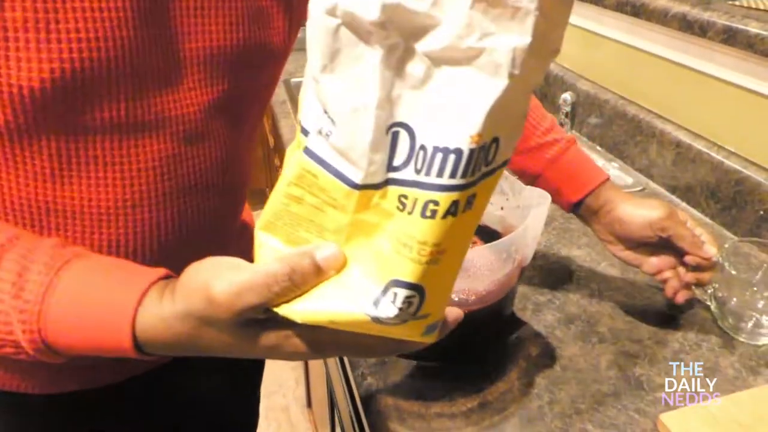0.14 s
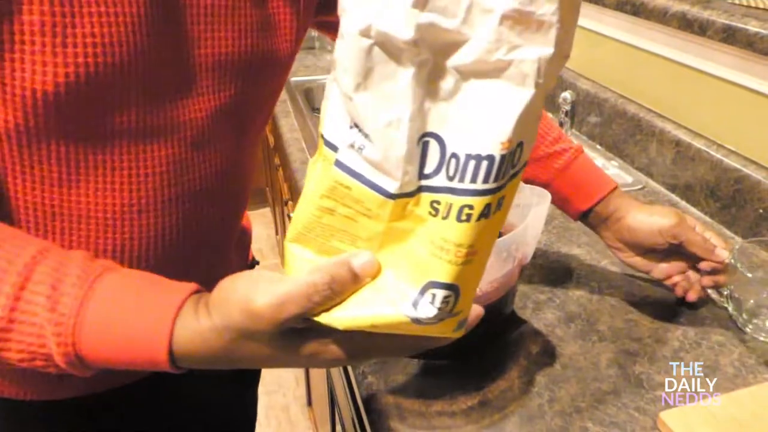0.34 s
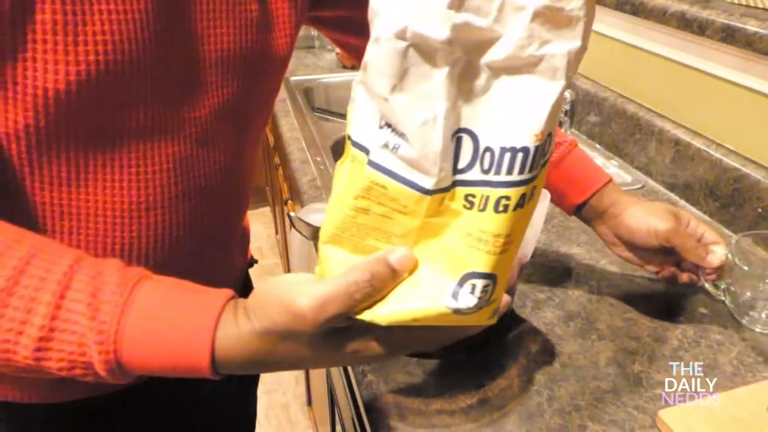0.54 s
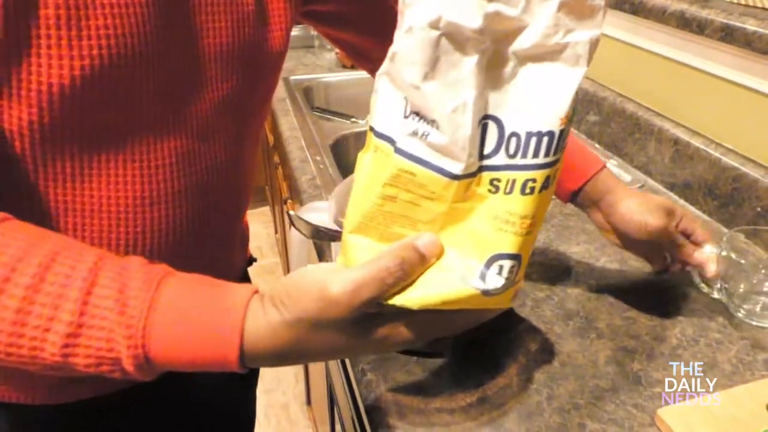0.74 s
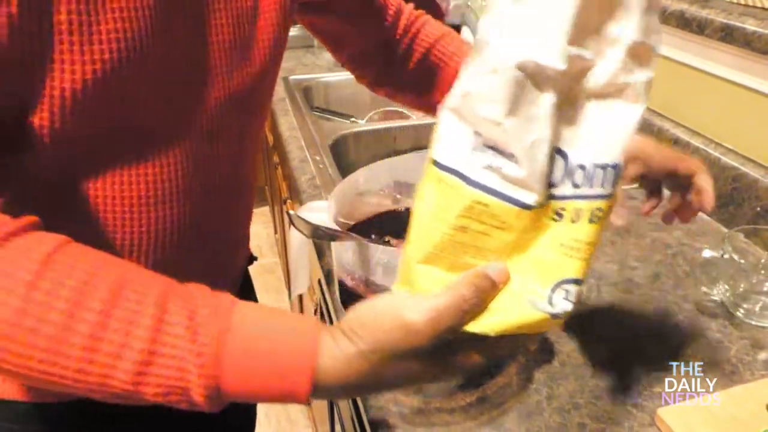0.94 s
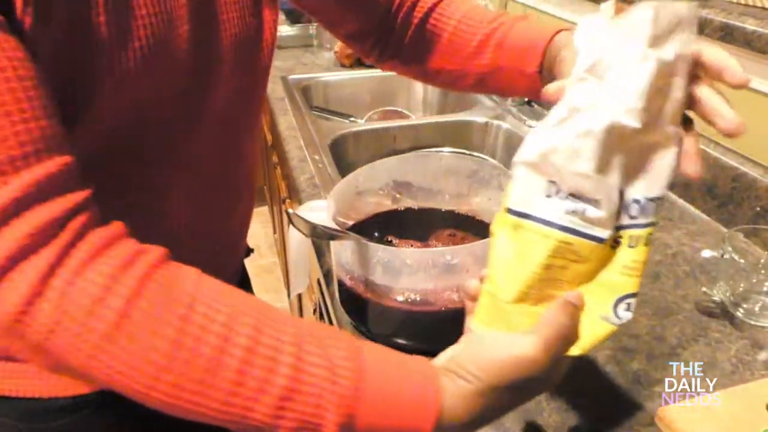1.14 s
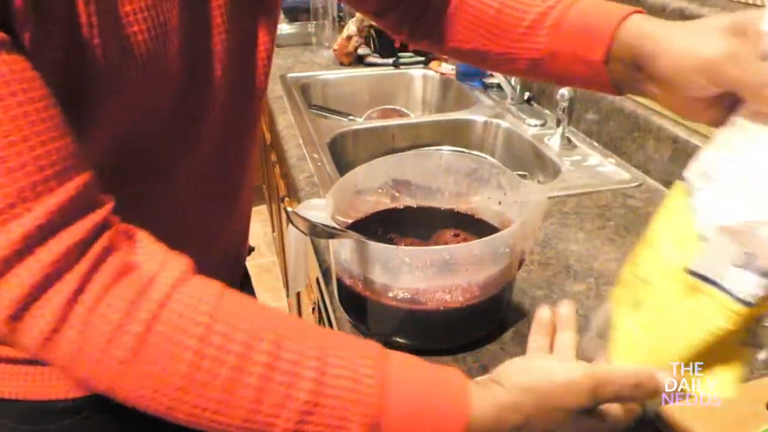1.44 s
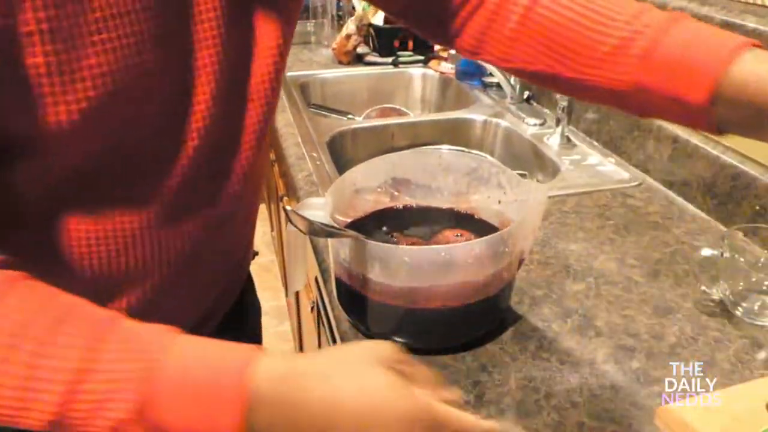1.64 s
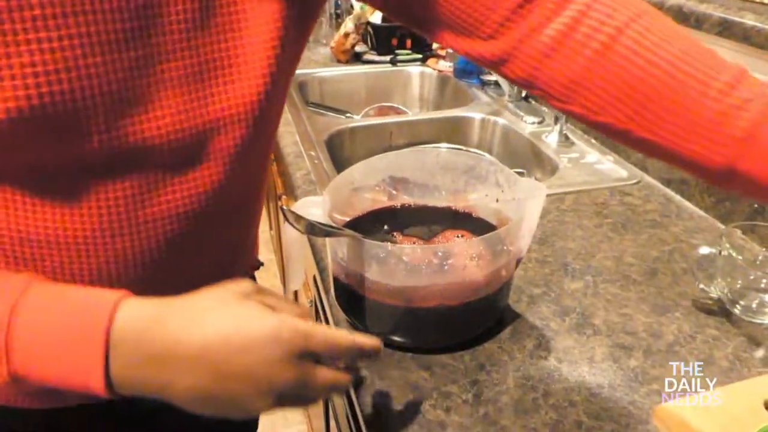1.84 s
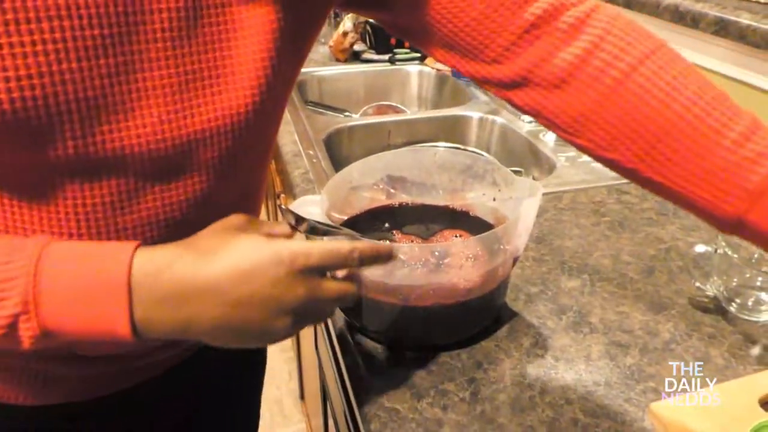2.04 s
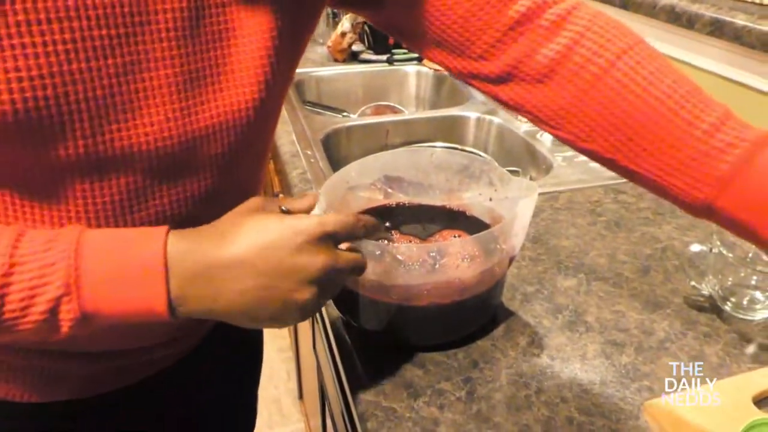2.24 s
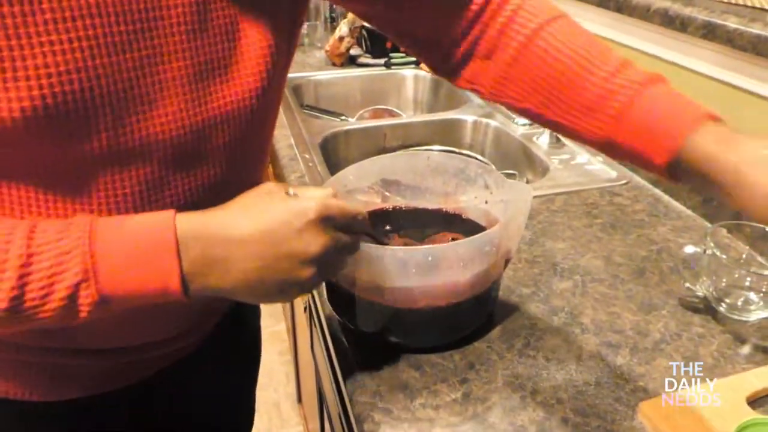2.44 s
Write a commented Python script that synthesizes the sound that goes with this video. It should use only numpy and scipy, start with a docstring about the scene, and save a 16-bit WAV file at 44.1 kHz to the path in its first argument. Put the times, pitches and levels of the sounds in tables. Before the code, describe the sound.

A glass measuring cup thumps onto a hollow kitchen counter, slides briefly, knocks again and settles with a faint ring; then a paper sugar bag snaps and rustles between hands. Small room, close, nearly mono.

```python
"""A glass measuring cup is set down on a hollow kitchen counter: it knocks, slides a little, rocks and settles.
Each contact is an impact: damped swings and filtered noise bursts excite the modes of counter and glass.
Then a paper sugar bag is passed from hand to hand and put aside: its snaps are bright bursts with hollow
pops, its rustle is grainy friction noise. Decaying noise gives the small kitchen's answer over a steady
room tone. The picture is nearly mono, and saturation rounds the hardest hits."""
import sys
import numpy as np
from scipy import signal
from scipy.fft import rfft, irfft, next_fast_len
from scipy.io import wavfile
from scipy.ndimage import uniform_filter1d

SR = 44100
rng = np.random.default_rng(int(sys.argv[2]) if len(sys.argv) > 2 else 0)


def file_out(sig):
    """Save sig as 16-bit WAV at sys.argv[1]."""
    # one column per channel
    cols = np.atleast_2d(sig).T
    # limit, then scale
    lim = np.clip(cols, -1, 1)
    pcm = np.round(lim * 32767).astype(np.int16)
    wavfile.write(sys.argv[1], SR, pcm)


N = 114660  # length of the scene in samples
T = np.arange(SR * 3 // 4) / SR  # time axis of one event, s
TOP_HZ = 15800  # band limit
KITCHEN_BAG_DB = -12  # room answer to the bag


def amp(db):
    """Level to gain: 20 dB is a factor of ten in amplitude."""
    return 10 ** (np.asarray(db) / 20)


def unit(x):
    """Normalisation to rms 1."""
    return x / np.sqrt(np.mean(x ** 2) + 1e-20)


def along(points, hz):
    """Interpolation of (f/Hz, value) points on a logarithmic frequency axis."""
    f, values = np.transpose(points)
    return np.interp(np.log(hz + 1), np.log(f + 1), values)


def colour(x, points):
    """Minimum-phase filtering: folding the cepstrum makes the gain of the (f/Hz, level/dB) points causal."""
    n = x.shape[-1]
    m = 2 * next_fast_len(n // 2 + 4096)
    log_gain = np.log(amp(along(points, np.fft.rfftfreq(m, 1 / SR))))
    cepstrum = irfft(log_gain, m)
    cepstrum[1:m // 2] *= 2
    cepstrum[m // 2 + 1:] = 0
    response = np.exp(rfft(cepstrum))
    return irfft(rfft(x, m) * response, m)[..., :n]


def fade(t60):
    """Exponential decay: the level falls 60 dB in t60 seconds."""
    return np.exp(-np.log(1000) * T / t60)


def add(track, s, x):
    """Superposition: x is summed into the track from s seconds on."""
    part = track[max(round(s * SR), 0):][:len(x)]
    part += x[:len(part)]


def push(hz, rise):
    """Heavily damped oscillation: a swing of a few cycles under an envelope built on a peak at rise seconds."""
    envelope = T / rise * np.exp(1 - T / rise)
    swing = -np.cos(2 * np.pi * hz * T) * envelope
    softened = swing * (1 - np.exp(-hz * T * 2))
    return np.gradient(softened) * SR / (2 * np.pi * hz)  # rate of change


def crack(spectrum, t60, edge=0):
    """Impulsive excitation: coloured decaying noise, at first about rms 1, led by an impulse of size edge."""
    shape = fade(t60)
    burst = rng.standard_normal(len(T)) * shape
    burst[0] += edge
    return unit(colour(burst, spectrum)) * np.sqrt(np.mean(shape ** 2))


def ring(modes, scatter_db):
    """Modal decay: each mode gets a random level at every strike and beats with a close twin."""
    beat_hz, twin_share = 12, .5  # beat_hz is the standard deviation of the twin's detuning
    out = 0
    for hz, db, t60 in modes:
        twin_hz = hz + beat_hz * rng.normal()
        pair = np.sin(2 * np.pi * hz * T) + twin_share * np.sin(2 * np.pi * twin_hz * T)
        out = out + amp(db + scatter_db * rng.normal()) * fade(t60) * pair
    return out / np.hypot(1, twin_share)


def noise(spectrum):
    """Stationary random noise through a spectrum, rms 1."""
    return unit(colour(rng.standard_normal(N), spectrum))


def friction(spectrum):
    """Stick-slip friction: tiny slips of uneven size and a few stronger catches through a spectrum, rms 1."""
    grains_per_s, grain_db = 1400, 1  # rate and spread of the random slip sizes
    catches_per_s, catch_share = 240, .58
    at = np.arange(N) * grains_per_s / SR
    sizes = amp(grain_db * np.interp(at, np.arange(N), rng.standard_normal(N)))
    slips = unit(sizes * rng.standard_normal(N))
    catches = (rng.random(N) < catches_per_s / SR) * rng.standard_normal(N)
    return unit(colour(slips + catch_share * unit(catches), spectrum))


def cup():
    """Impact excitation: each contact clicks and thuds, rings counter and glass, and stirs the cabinet."""
    # contacts of the cup: t/s, thud level/dB, thud f/Hz, click level/dB, glass level/dB
    knocks = [(0.197, -55, 425, -41, -65), (0.2442, 1, 398, -4.5, -44.5), (0.272, -17, 485, -38, -63),
              (0.4612, -20.5, 370, -64, -69), (0.4776, -7.5, 354, -24.5, -39),
              (0.7505, -25.5, 386, -32, -55.5), (0.7757, -4.5, 387, -22, -46.5),
              (0.8562, -11.5, 370, -35, -49.5), (0.9064, -16, 390, -41, -51), (.9526, -6, 348, -10.5, -25),
              (0.973, -12.5, 460, -33, -65), (0.9844, -12, 404, -33, -30.5), (1.0003, -22, 360, -32.5, -47),
              (1.0092, -16.5, 449, -44, -36.5)]
    # spectrum of the contact click: f/Hz, level/dB
    click_spectrum = [(150, -18), (600, 8.5), (950, 4), (1550, -6), (3000, -3), (5500, -16), (7000, -23),
                      (9000, -65)]
    # modes of the cup: f/Hz, level/dB, t60/s
    glass_modes = [(1020, 0, .05), (1030, -14, .27), (1570, 4, .05), (1614, -4.5, .42), (1680, -14, .25),
                   (1810, -19, .5)]
    # spectrum of the glass buzzing on the counter: f/Hz, level/dB
    chatter_spectrum = [(200, -27), (600, 10.5), (1700, 0), (2200, -12.5), (4500, -23), (9000, -42)]
    # modes of the counter: f/Hz, level/dB, t60/s
    counter_modes = [(135.2, -35.5, 0.31), (252.4, -25.5, 0.47), (333, -20, 0.11), (415, -18.5, 0.18),
                     (473.8, -26.5, 0.29), (558, -25.5, 0.35)]
    thud_rise_s, click_t60_s = 0.0017, 0.011
    thud_lag_s = 0.00039  # the counter gives way just after the glass touches it
    tock_hz, tock_db, tock_rise_s = 734, -2.5, 0.00057  # higher swing of the counter top, scaled with the click
    chatter_db, chatter_t60_s = 5, 0.23
    cabinet_thud_db, cabinet_click_db, kitchen_db = 2, -3, -14.5

    out = np.zeros(N)
    for s, thud_db, hz, click_db, glass_db in knocks:
        thud = amp(thud_db) * np.interp(T - thud_lag_s, T, push(hz, thud_rise_s), left=0)
        tock = amp(tock_db) * push(tock_hz, tock_rise_s)
        click = amp(click_db) * (crack(click_spectrum, click_t60_s, edge=3.7) + tock)
        chatter = amp(chatter_db) * crack(chatter_spectrum, chatter_t60_s)
        glass = amp(glass_db) * (ring(glass_modes, scatter_db=4) + chatter)
        counter = amp(thud_db) * ring(counter_modes, scatter_db=0.5)
        hit = thud + click + counter + glass
        add(out, s, hit)
        add(out, s, amp(cabinet_thud_db) * cabinet(thud) + amp(cabinet_click_db) * cabinet(click))
        add(out, s, amp(kitchen_db) * signal.fftconvolve(hit, kitchen()))
    return out


def cabinet(x):
    """High modal density: decaying noise stands for the dense ringing that x stirs up under the counter."""
    # spectrum of the ringing: f/Hz, level/dB
    cabinet_spectrum = [(80, -37), (180, -19.5), (550, -9), (900, 1), (1400, 2), (2500, -10), (6000, -30),
                        (15000, -24)]
    t60_s, delay_s = 0.68, 0.00069
    tail = rng.standard_normal(len(T)) * fade(t60_s) * (T > delay_s)
    return signal.fftconvolve(x, colour(tail / np.linalg.norm(tail), cabinet_spectrum))


def slide():
    """Sliding friction: the foot scrapes, and a narrow judder band glides up in pitch, then drops a little."""
    # strokes of the cup: start t/s, length t/s, level/dB
    slides = [(0.27, 0.39, -39), (0.584, 0.19, -37)]
    # spectrum of the scrape: f/Hz, level/dB
    scrape_spectrum = [(100, -48), (230, 1), (400, 4), (600, -3), (1600, -17.5), (6000, -27.5), (9000, -46)]
    # judder of the foot as the cup is pushed along: t/s, slip rate f/Hz, level/dB
    judder_path = [(0.578, 369.7, -47), (.635, 485.3, -38.5), (.68, 515, -43), (.71, 604, -46),
                   (.745, 537, -52)]
    judder_width_hz = 90
    t = np.arange(N) / SR
    strokes = 0
    for start, length, stroke_db in slides:
        strokes = strokes + amp(stroke_db) * np.sin(np.pi * np.clip((t - start) / length, 0, 1))
    s, hz, db = np.transpose(judder_path)
    # slow random modulation of a gliding carrier makes a narrow band of noise
    grip = uniform_filter1d(rng.standard_normal((2, N)), int(SR / judder_width_hz))
    phase = 2 * np.pi * np.cumsum(np.interp(t, s, hz)) / SR
    judder = unit(grip[0] * np.sin(phase) + grip[1] * np.cos(phase))
    judder_gain = np.interp(t, s, amp(db), left=0, right=0)
    return strokes * friction(scrape_spectrum) + judder_gain * judder


def bag_snaps():
    """Buckling: a crease flips with a bright crack and pumps the air in the bag; the wall shakes with the pop."""
    # buckles: t/s, crack level/dB, crease f/Hz, crack t60/s, pop level/dB, pop f/Hz
    snaps = [(1.2492, -21, 1330, 0.048, -19, 1020), (1.2532, -32, 3400, 0.076, -20, 335),
             (1.281, -43, 3150, 0.015, -26, 1120), (1.300, -27, 4770, 0.082, -29.5, 1020),
             (1.370, -16, 4150, 0.023, -14, 860), (1.388, -13, 3600, 0.022, -14, 790),
             (1.4042, -5.5, 4890, 0.0099, -10.5, 752), (1.4055, -7, 5340, 0.02, -15, 454),
             (1.4359, -8, 6430, 0.023, -25, 1075), (1.562, -30, 2150, 0.0076, -28.5, 770),
             (1.638, -34.5, 2400, 0.27, -43, 920), (1.659, -28, 2170, 0.042, -42, 1000),
             (1.739, -31.5, 2180, 0.021, -36.5, 647), (1.918, -21, 2140, 0.024, -19, 355),
             (1.94, -12.5, 2870, 0.038, -11, 860), (1.945, -11, 6740, 0.029, -16.5, 1090),
             (2.1214, -8.5, 4920, 0.03, -38, 640), (2.1247, -6.5, 2830, 0.0076, -44, 660),
             (2.1295, -9, 6400, 0.0038, -49, 700), (2.152, -14.5, 5150, 0.0097, -45, 885),
             (2.175, -40, 2440, 0.022, -23.5, 1424), (2.35, -35, 8640, 0.013, -47, 900)]
    # spectrum of the crackling paper: f/Hz, level/dB
    paper_spectrum = [(100, -38), (350, -3.5), (900, -12.5), (1600, -4.5), (3400, 3.5), (6700, -4.5),
                      (9000, -10), (15000, -37)]
    # spectrum of the shaking wall: f as a multiple of the pop pitch [1], level/dB
    wall_points = [(.2, -24), (.6, -0.5), (1.2, 3.5), (4, -14), (15, -55)]
    crease_share, crease_t60_s, pop_rise_s = .7, .008, .0013
    slope_db = -4  # per octave above the crease pitch
    pop_rattle, pop_t60_s = 0.38, 0.05  # share and decay of the wall's shaking

    out = np.zeros(N)
    for s, crack_db, crease_hz, t60, pop_db, pop_hz in snaps:
        crease = crease_share * np.sin(2 * np.pi * crease_hz * T) * fade(crease_t60_s)
        wall = crack([(multiple * pop_hz, db) for multiple, db in wall_points], pop_t60_s)
        dulling = [(crease_hz, 0), (TOP_HZ, slope_db * np.log2(TOP_HZ / crease_hz))]
        paper = colour(crack(paper_spectrum, t60, edge=0.66), dulling)
        pop = push(pop_hz, pop_rise_s) + pop_rattle * wall
        snap = amp(crack_db) * (0.5 * paper + crease) + amp(pop_db) * pop
        add(out, s, snap)
        add(out, s, amp(KITCHEN_BAG_DB) * signal.fftconvolve(snap, kitchen()))
    return out


def bag_rustle():
    """Rubbing friction: under the hands a hollow body and a grainy hiss swell and fade, with a room tail."""
    # rubs: peak t/s, rise to the peak from -20 dB t/s, fall to -20 dB t/s, body level/dB, hiss level/dB
    rubs = [(1.198, 0.018, 0.26, -36.5, -41), (1.259, 0.042, 0.069, -42, -44.5),
            (1.345, 0.15, 0.39, -39.5, -44), (1.53, 0.028, 0.037, -41.5, -67),
            (1.691, 0.029, 0.042, -44.5, -49.5), (1.754, 0.037, 0.047, -43.5, -51),
            (1.896, 0.16, 0.2, -69, -43), (1.936, 0.044, 0.13, -31, -40),
            (2.106, 0.019, 0.12, -43.5, -35.5), (2.157, 0.047, 0.11, -34.5, -42),
            (2.272, 0.055, 0.026, -51.5, -46)]
    # spectrum of the hollow body: f/Hz, level/dB
    body_spectrum = [(130, -10.5), (330, 3), (900, 7), (1600, 2.5), (3000, -4), (5000, -6), (9000, -33)]
    # spectrum of the hiss: f/Hz, level/dB
    hiss_spectrum = [(1000, 2.5), (6800, 5.5), (9000, 0.5), (12000, -6), (15500, -17)]
    t, body, hiss = np.arange(N) / SR, 0, 0
    for s, rise, fall, body_db, hiss_db in rubs:
        swell_db = -20 * np.where(t < s, ((s - t) / rise) ** 2, (t - s) / fall)
        body = np.hypot(body, amp(body_db + swell_db))  # overlapping rubs add in power
        hiss = np.hypot(hiss, amp(hiss_db + swell_db))
    rub = body * friction(body_spectrum) + hiss * friction(hiss_spectrum)
    return rub + amp(KITCHEN_BAG_DB) * signal.fftconvolve(rub, kitchen())[:N]


def kitchen():
    """Diffuse reverberation: a fresh noise tail of energy 1 whose treble decays sooner."""
    # decay of the room: f/Hz, t60/s
    room_decay = [(1000, 0.41), (5000, 0.34)]
    hz, t, z = signal.stft(rng.standard_normal(len(T)), SR, nperseg=256)
    decay = np.exp(-np.log(1000) * t / along(room_decay, hz)[:, None])
    tail = signal.istft(z * decay, SR)[1][:len(T)]
    tail = tail * np.clip(T / 0.0051 - 1, 0, 1)  # silent for 5.1 ms, then rising for as long
    return tail / np.linalg.norm(tail)


def room_tone():
    """Ambient noise: steady coloured noise, with a weak independent part unlike left and right."""
    # spectrum of the middle: f/Hz, level/dB
    air_mid = [(27, 9), (45, -8.5), (180, -7), (250, 3.5), (350, 0), (480, -8.5), (900, -11.5),
               (2000, -19.5), (10000, -26.5)]
    # spectrum of the side: f/Hz, level/dB
    air_side = [(30, -2.5), (9000, -15.5)]
    return amp(-49) * noise(air_mid), amp(-68) * noise(air_side)


def scene():
    """Mid-side stereo: cup and bag in the middle over the room tone, with a trace of reverberant width."""
    width = 0.016
    action = cup() + slide() + bag_snaps() + bag_rustle()
    air_mid, air_side = room_tone()
    mid = action + air_mid
    spread = signal.fftconvolve(action, kitchen())[:N]
    side = width * colour(spread, [(400, -38), (3000, 6)]) + air_side
    return np.array([mid + side, mid - side])


def record(dry):
    """Saturation and band-limiting: the loudest peaks are rounded off, then all above TOP_HZ is removed."""
    overload = 1.1  # amplitude that the rounded peaks approach
    x = dry / (1 + np.abs(dry / overload) ** 6) ** (1 / 6)
    m = next_fast_len(N + SR // 2)
    passband = np.fft.rfftfreq(m, 1 / SR) < TOP_HZ
    return irfft(rfft(x, m) * passband, m)[:, :N]


dry = scene()
out = record(dry)
file_out(out)
```